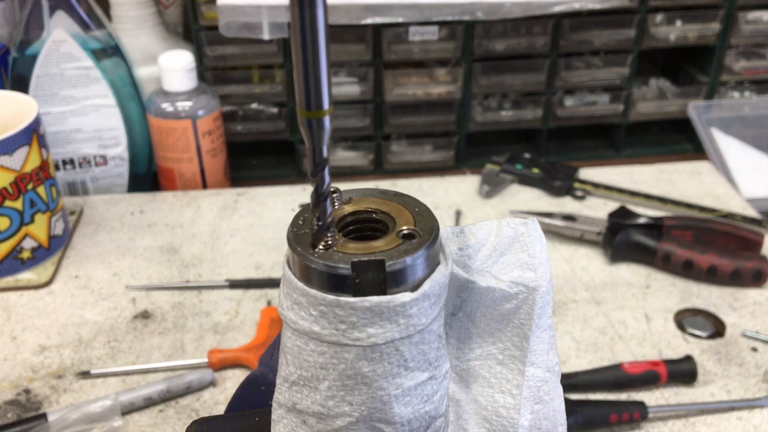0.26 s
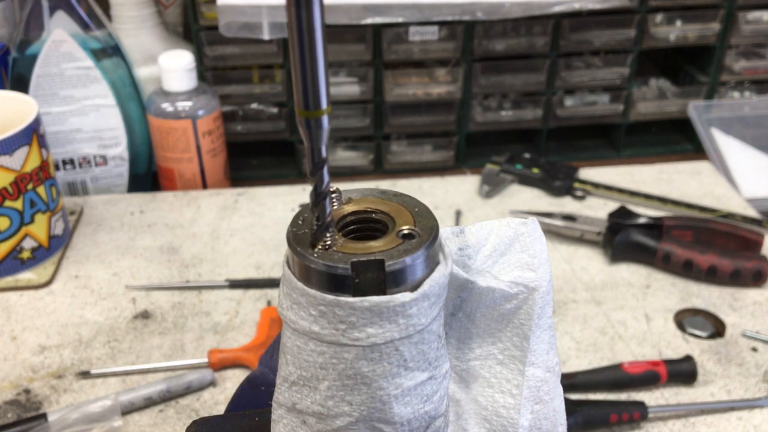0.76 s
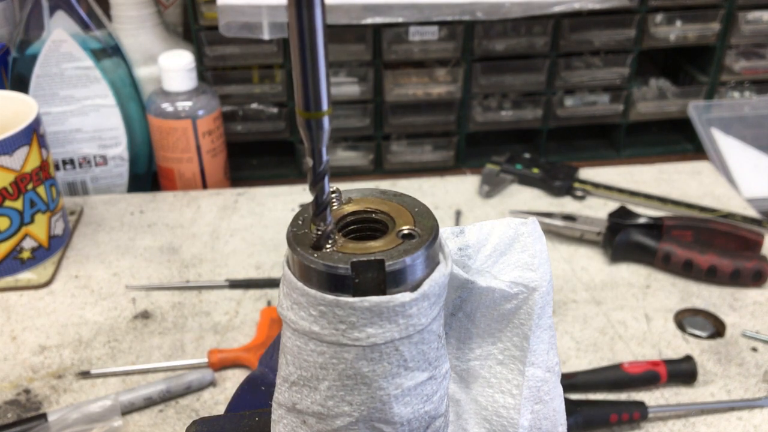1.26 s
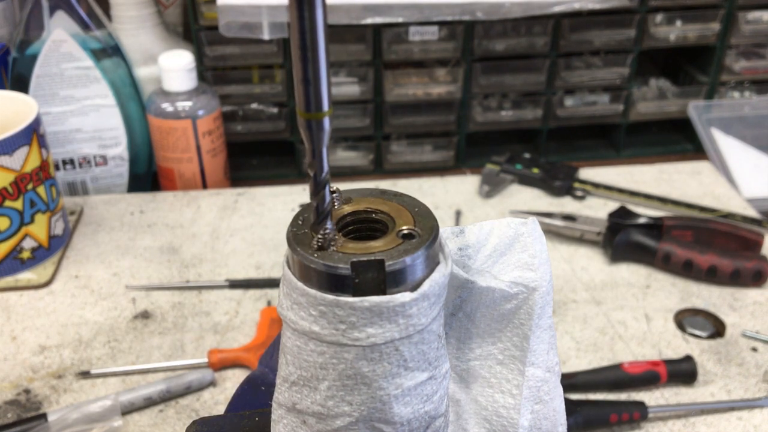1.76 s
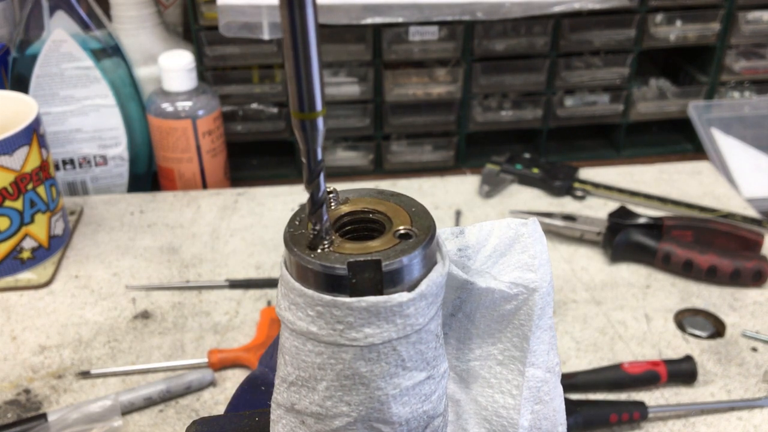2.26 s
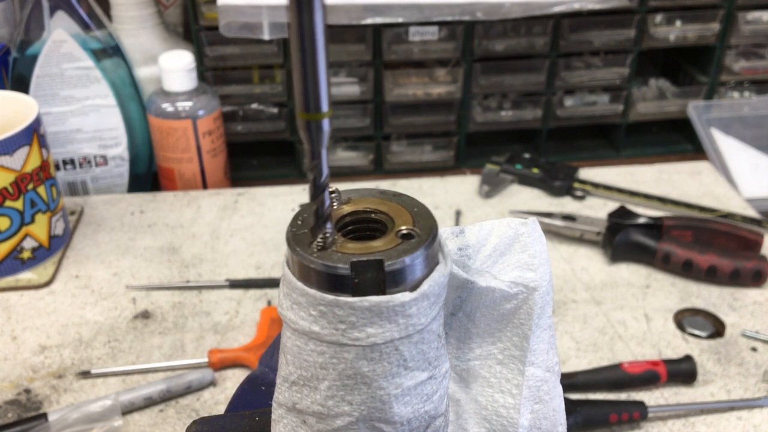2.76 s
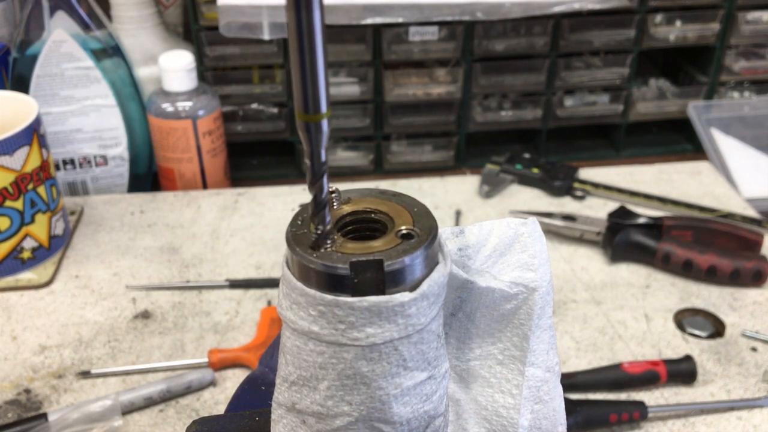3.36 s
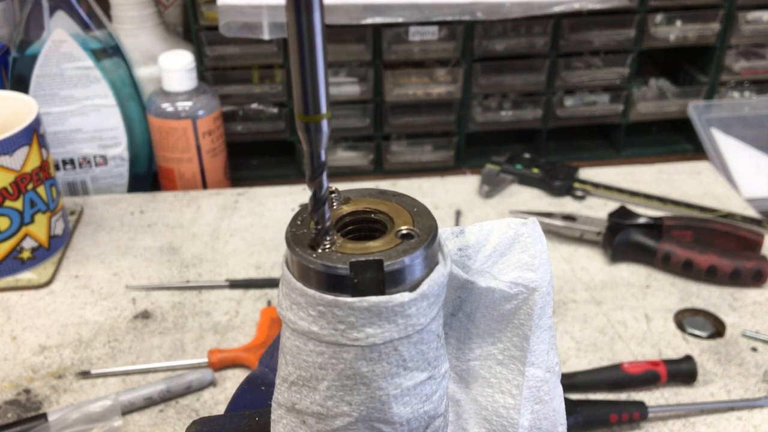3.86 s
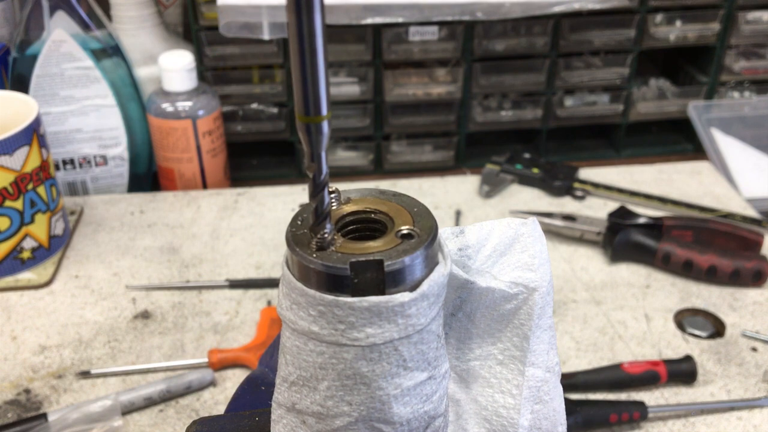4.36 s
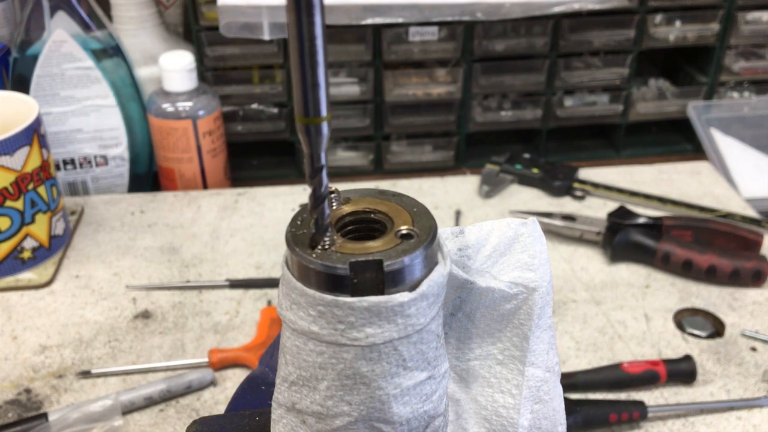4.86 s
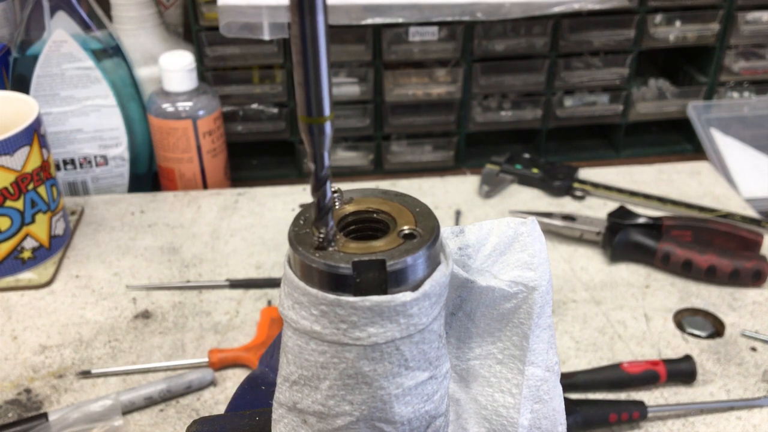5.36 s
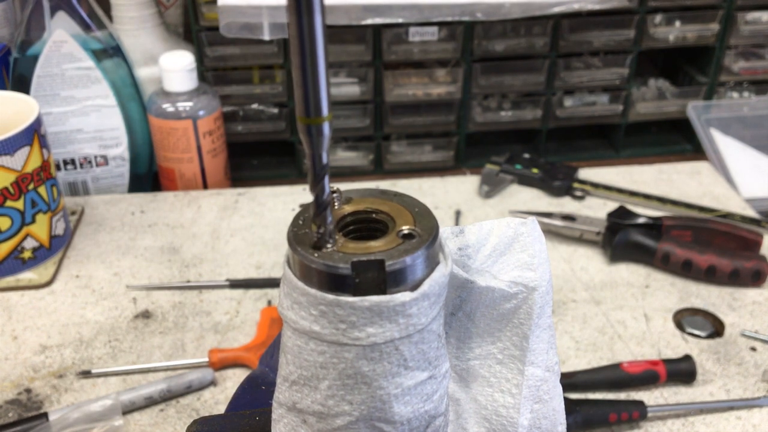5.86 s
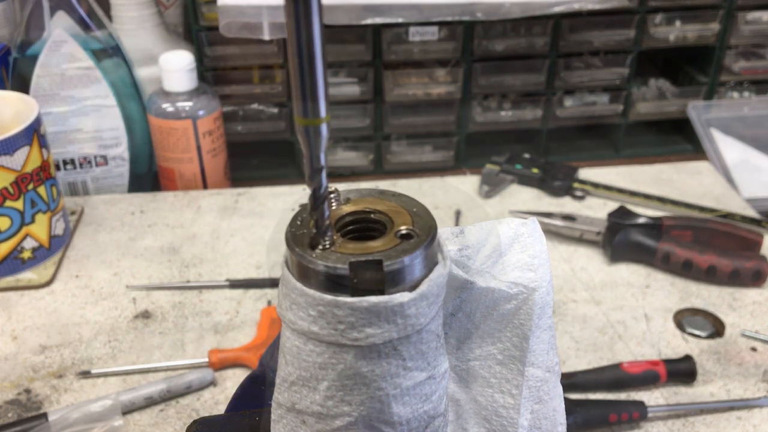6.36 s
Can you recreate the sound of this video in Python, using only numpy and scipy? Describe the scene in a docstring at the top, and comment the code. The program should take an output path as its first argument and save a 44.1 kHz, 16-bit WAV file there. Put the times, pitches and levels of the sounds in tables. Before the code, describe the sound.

A rasp already under way stops, then sharp ratchet clicks begin a steady back-and-forth: click, brief harsh metallic squeak, click, squeak. The squeals are gritty and uneven, sometimes dropping to a lower groan. Light handling and dull bench knocks fill the gaps. Close, dry mono sound with short room reverberation; after the last stroke only quiet hum and room tone remain.

```python
"""A hand tap cuts a steel part under a ratcheting wrench, close to the microphone in a small workshop.
Each forward stroke rasps and at times squeaks: stick-slip overtones and grit ring the steel.
Sudden slips, mostly at stroke starts, crack: noise bursts through the same steel resonances.
Between strokes the pawl clicks: cracks, knocks and ringing; the handle rubs and the bench thuds.
Behind lie a low machine hum and faint room noise, both coloured noise, and a short room reverberation."""
import sys
import numpy as np
from scipy import signal
from scipy.fft import rfft, irfft, next_fast_len
from scipy.io import wavfile
from scipy.ndimage import uniform_filter1d, map_coordinates

SR = 44100
rng = np.random.default_rng(int(sys.argv[2]) if len(sys.argv) > 2 else 0)


def persist_wave(psi):
    """Save psi, clipped to +-1, as 16-bit WAV."""
    counts = np.round(np.clip(psi, -1, 1) * 32767).astype(np.int16)
    wavfile.write(sys.argv[1], SR, np.atleast_2d(counts).T)


N = 291501

# machine hum, relative spectrum: (frequency [Hz], density [dB per Hz])
HUM_SPECTRUM = [(25, -39), (40, -7.5), (51, -13.5), (56, 0.5), (62, -2.5), (80, -19.5), (110, -40.5),
                (200, -120)]
# machine hum over time: (time [s], level [dB])
HUM_LEVEL = [(0.0, -49), (1.71, -54), (6.61, -55.5)]
# room noise, relative spectrum: (frequency [Hz], density [dB per Hz])
AIR_SPECTRUM = [(53, -28.5), (90, -13.5), (119, -3.5), (165, -15.5), (242, -11.5), (321, -13.5), (828, -24),
                (1760, -24.5), (2650, -33.5), (11500, -42.5), (15500, -46)]
AIR_DB = -58.5  # middle of the wandering room noise level
# reverberation of the workshop: (frequency [Hz], t60 [s])
ROOM_DECAY = [(300, 0.53), (2000, 0.21), (6000, 0.28), (14000, 0.15)]
# the handle rubs briefly in the hand: (time [s], peak before the resonances [dB])
RUBS = [(0.403, -40.5), (0.728, -42.5), (1.181, -52.5), (1.419, -38.5), (2.048, -43.5), (2.089, -30),
        (2.665, -40.5), (2.97, -40.5), (3.278, -38.5), (3.849, -38), (4.268, -36.5), (4.518, -34.5),
        (5.18, -34), (5.551, -28.5), (5.651, -31), (5.758, -35.5)]
# soft thuds through the bench: (time [s], relative peak before the resonances [dB])
THUDS = [(0.487, -45), (1.209, -48), (1.391, -45), (1.85, -51), (2.091, -43), (2.454, -51), (2.683, -43),
         (3.285, -43.5), (3.636, -46), (3.925, -47.5), (4.353, -41.5), (4.536, -49.5), (4.718, -64),
         (4.914, -46.5), (4.996, -47), (5.168, -42), (5.509, -44), (5.779, -52), (6.507, -46.5)]
# resonances of the bench: (frequency [Hz], width [Hz], gain [dB])
BENCH = [(124, 52, 4), (246, 110, -0.5), (295, 35, 6.5), (424, 72, -5.5)]
# pawl and handle contacts: (time [s], relative peak [dB], relative middle band peak [dB])
CLICKS = [(0.3901, -37.5, -48), (0.4536, -17, -36.5), (0.4726, -6, -20), (0.5088, -19, -38),
          (0.5399, -9.5, -18.5), (0.7042, -33, -59), (1.2009, -25, -39), (1.2507, -20.5, -43),
          (1.2678, -6.5, -20), (1.306, -15.5, -42), (1.374, -31, -44.5), (1.383, -9, -23),
          (1.7974, -43, -39.5), (1.8142, -26.5, -35.5), (1.862, -16, -39.5), (1.8794, -9.5, -24.5),
          (1.9193, -17.5, -41.5), (2.0818, -21.5, -41), (2.3687, -36.5, -37.5), (2.3935, -29, -50),
          (2.429, -36, -40.5), (2.4336, -24, -44), (2.4375, -22.5, -44.5), (2.445, -7, -28),
          (2.4923, -15.5, -42.5), (2.6612, -34, -50), (2.9973, -28.5, -43.5), (3.0295, -16, -23),
          (3.047, -11, -22.5), (3.0726, -18, -39.5), (3.0854, -7, -25), (3.1419, -17, -35.5),
          (3.2702, -22.5, -47), (3.6353, -22, -40), (3.6581, -39.5, -30.5), (3.6696, -18.5, -40.5),
          (3.6863, -7, -23.5), (3.7235, -17, -37), (3.9063, -27.5, -45.5), (4.2906, -28, -35.5),
          (4.2968, -23, -32.5), (4.3258, -17, -35), (4.3374, -6.5, -20.5), (4.3658, -12, -38),
          (4.3889, -10, -23.5), (4.9047, -24.5, -32.5), (4.934, -32.5, -46), (4.9493, -19, -41),
          (4.9645, -8, -25), (4.9965, -14.5, -51), (5.1344, -31, -33), (5.1741, -27, -54),
          (5.5013, -43.5, -37.5), (5.5216, -33.5, -44.5), (5.545, -24, -33.5), (5.5568, -15.5, -30.5),
          (5.5692, -28.5, -40.5), (5.5735, -6.5, -27), (5.5981, -19.5, -48.5), (5.6123, -25.5, -40),
          (5.6134, -8.5, -25.5), (5.6469, -25, -30), (5.7482, -28, -45), (6.1641, -39, -53)]
# pawl, clusters of close modes: (frequency [Hz], width [Hz], gain [dB])
PAWL_MODES = [(3330, 160, -9), (9200, 500, -17), (10850, 100, -7), (11100, 100, -5), (11480, 110, 0),
              (11640, 100, 0), (11920, 110, -3), (12700, 400, -16)]
FULL_DROP_DB = -29  # a middle band above this marks the pawl falling fully into a tooth
DROP_RING_DB, TICK_RING_DB = -5.5, -12.5  # ring of the pawl for full drops and for lighter ticks, relative
# tap, part and vice: (frequency [Hz], width [Hz], gain [dB])
PART_MODES = [(509, 580, -26), (733, 94, -1.5), (1238, 52.7, 8), (1479, 39, 2), (1965, 8.8, 7.5),
              (1979, 49, 0.5), (2234, 160, 3), (2598, 97, 2.5), (2720, 93, -9), (3126, 48, -1.5),
              (3730, 400, -12), (4120, 27, -10.5), (4840, 45, -5), (2233, 660, 0)]
# high resonances of the tap: (frequency [Hz], width [Hz], gain [dB])
EDGE_MODES = [(7830, 320, -2), (8700, 700, -7.5), (9310, 300, -1), (11200, 770, -7.5), (14570, 8200, -12),
              (10100, 1300, -20)]
SCRAPE_TOP_HZ = 15950  # upper band limit of the scraping sound
# sudden slips, mostly at stroke starts: (time [s], relative peak [dB], relative treble peak [dB])
JERKS = [(.853, -16.5, -18), (1.5424, -16.5, -4.5), (2.1426, -13.5, -19), (2.7697, -13, -17.5),
         (3.3671, -15, -23.5), (4.0293, -11.5, -11.5), (4.598, -24.5, -5), (5.2638, -11, 1),
         (5.3527, -23.5, -13), (5.885, -29, -3)]
# forward strokes, one list each: (time [s], level [dB])
STROKES = [
    [(0.0, -22.5), (0.05, -24), (0.142, -23), (0.21, -29), (0.23, -66)],
    [(0.853, -29), (0.857, -30.5), (0.93, -60.5)],
    [(0.972, -37), (0.996, -34), (1.004, -22), (1.028, -23.5), (1.04, -18), (1.06, -23.5), (1.098, -26.5),
     (1.112, -49.5)],
    [(1.541, -25.5), (1.551, -18), (1.593, -20.5), (1.623, -45.5), (1.639, -35.5), (1.697, -39.5),
     (1.723, -25), (1.75, -64)],
    [(2.143, -28), (2.167, -21), (2.275, -22.5), (2.297, -47)],
    [(2.77, -23.5), (2.78, -16), (2.792, -17.5), (2.826, -37), (2.872, -33.5), (2.894, -24.5),
     (2.93, -62.5)],
    [(3.367, -29), (3.381, -19.5), (3.401, -17.5), (3.529, -26), (3.548, -39.5)],
    [(4.03, -22), (4.038, -21), (4.072, -19.5), (4.102, -29), (4.136, -41.5), (4.172, -37.5),
     (4.184, -20.5), (4.21, -56)],
    [(4.598, -30), (4.602, -23.5), (4.628, -34.5), (4.65, -20), (4.746, -27.5), (4.786, -18), (4.84, -46.5)],
    [(5.263, -26), (5.277, -18.5), (5.315, -43.5), (5.331, -29), (5.369, -31.5), (5.385, -21.5),
     (5.411, -26.5), (5.44, -50)],
    [(5.886, -21), (5.898, -16), (5.92, -25.5), (6.026, -22.5), (6.068, -26.5), (6.085, -49)],
]
# spells of steady slipping, each until the next or the end of the stroke: (start [s], first slip rate [Hz],
# last slip rate [Hz], roughness before the bite [0-1], treble over the level before bite and dulling [dB])
SPELLS = [(0, 629, 640.6, 0.82, -9), (.14, 1131, 1025, 0.58, -4), (0.854, 1281, 1240, 0.55, -20),
          (.972, 1312, 1321, 0.65, -6), (0.999, 1408, 1183, .5, -13), (1.028, 1346, 1206, 0.32, -10.5),
          (1.04, 1200, 1190, .15, -11), (1.054, 1022, 974, .45, -13), (1.08, 662, 707, 0.5, -13),
          (1.542, 1224, 1259, 0.36, -17.5), (1.605, 1254, 1280, 0.31, -35), (1.705, 1125, 1197, 0.68, -6.5),
          (2.143, 1058, 1235, 0.42, -4.5), (2.19, 714.7, 681, 0.67, -7), (2.218, 1067, 1107, .4, -4),
          (2.26, 715, 697.4, 0.57, -8), (2.77, 1200, 1267, 0.35, -15), (2.814, 1276, 1326, 0.45, -20),
          (2.88, 1330, 1290, 0.73, -8), (3.368, 1228, 1203, 0.16, -8.5), (3.462, 692.3, 650, 0.72, -10),
          (4.03, 1215, 1255, .17, -17), (4.12, 1227, 1219, 0.56, -28), (4.175, 1252, 1273, 0.54, -15.5),
          (4.597, 1254, 1307, .55, -26), (4.64, 1281, 1199, .2, -8), (4.697, 1110, 1111, 0.31, -6),
          (4.735, 686.6, 667, 0.66, -5.5), (4.757, 1140, 1231, 0.3, -12.5), (4.8, 707.8, 707, 0.43, -13),
          (5.263, 1261, 1267, 0.31, -28), (5.335, 1276, 1207, 0.75, -10), (5.391, 696.5, 689.3, .55, -11.5),
          (5.886, 1287, 1200, 0.31, -15), (5.918, 679.6, 744.4, .75, -6), (5.99, 780, 810.4, 0.39, -9),
          (6.03, 510.5, 523, 0.66, -13)]
# how the tap passes on the slips: (frequency [Hz], gain [dB])
RADIATED = [(450, -23), (700, -4), (1230, -2.5), (1700, 0), (2400, 2.5), (3200, -2), (3700, -7),
            (4900, -15), (6100, -37.5), (7500, -18)]
CHANGE_S = .003  # one spell passes into the next
BITE_S, BITE_ROUGH, BITE_DB = 0.011, 0.4267, 14  # decay, added roughness and added treble as a stroke starts
GENTLE_DB, DULLING = -21, .8  # below this level the treble falls away faster, extra dB per dB
TOP_HZ = 17000  # upper band limit of the whole sound


def amp(db):
    """Amplitude factor of a level in dB."""
    return 10 ** (np.asarray(db) / 20)


def unit(x):
    """x scaled to rms 1."""
    return x / np.sqrt(np.mean(x ** 2) + 1e-20)


def along(points, hz):
    """Interpolate (Hz, value) points on a log frequency axis."""
    f, v = np.transpose(points)
    return np.interp(np.log(hz + 1), np.log(f + 1), v)


def played(tables):
    """Every column per sample, and a gate that is open while a table lasts."""
    t = np.arange(N) / SR
    s, *cols = np.transpose(np.vstack(tables))
    gate = sum((t >= rows[0][0]) & (t < rows[-1][0]) for rows in tables) > 0
    return [np.interp(t, s, c) for c in cols] + [gate]


def wobble(rate):
    """A smooth random curve, rate knots a second."""
    knots = rng.standard_normal(int(N * rate / SR) + 4)
    return map_coordinates(knots, [np.arange(N) * rate / SR])


def filtered(x, response):
    """Filter x by a complex response of frequency, padded so that ringing does not wrap round."""
    m = next_fast_len(N + SR // 2)
    return irfft(rfft(x, m) * response(np.fft.rfftfreq(m, 1 / SR)), m)[..., :N]


def resonant(peaks):
    """Causal response of (Hz, width Hz, dB) resonances, summed with alternating sign."""
    def response(f):
        total = 0
        for k, (centre, width, db) in enumerate(peaks):
            mode = 1j * f * width / (centre * centre - f * f + 1j * f * width)
            total = total + (-1) ** k * amp(db) * mode
        return total
    return response


def resonant_twice(peaks):
    """The resonances in series with themselves: steeper flanks, and gains that double in dB."""
    return lambda f: resonant(peaks)(f) ** 2


def noise(spectrum):
    """Coloured noise of rms 1."""
    return unit(filtered(rng.standard_normal(N), lambda hz: amp(along(spectrum, hz))))


def bursts(times, levels_db, rise, t60, tone_hz=None):
    """A short puff of noise, or of a tone near tone_hz, at each time; rise and t60 [s] may vary by puff."""
    t = np.arange(SR // 5) / SR
    rise, t60 = np.reshape(rise, (-1, 1)), np.reshape(t60, (-1, 1))
    envelope = (1 - np.exp(-(t / rise) ** 2)) * amp(-60 * t / t60)
    if tone_hz:
        pitch = tone_hz * (1 + .02 * rng.standard_normal((len(times), 1)))
        carrier = np.sin(2 * np.pi * pitch * t)
    else:
        carrier = rng.standard_normal((len(times), len(t)))
    puff = envelope * carrier
    puff = puff / np.abs(puff).max(axis=1, keepdims=True) * amp(levels_db)[:, None]
    where = np.round(times * SR).astype(int)[:, None] + np.arange(len(t))
    return np.bincount(where.ravel(), puff.ravel(), N + len(t))[:N]


def room_noise():
    """Faint broadband noise of the workshop, its level wandering slightly."""
    return amp(AIR_DB + 2.4 * wobble(14)) * noise(AIR_SPECTRUM)


def machine_hum():
    """Narrow low noise of a machine, following its level in time."""
    level_db, _ = played([HUM_LEVEL])
    return amp(level_db) * noise(HUM_SPECTRUM)


def room(x):
    """Reverberation by convolution with a noise tail in which each frequency dies at its own speed."""
    hz, t, z = signal.stft(rng.standard_normal(SR // 2), SR, nperseg=256)
    decay = amp(-60 * t / along(ROOM_DECAY, hz)[:, None])
    tail = signal.istft(z * decay, SR, nperseg=256)[1]
    delayed = np.pad(x, (130, 0))  # samples, about 3 ms
    return signal.fftconvolve(delayed, tail / np.linalg.norm(tail))[:N]


def handling():
    """Rubs of the handle and soft thuds that shake the bench: noise puffs through broad and low modes."""
    puffs = bursts(*np.transpose(RUBS), 0.005, .08)
    rubs = filtered(puffs, resonant([(1060, 1100, 12.2), (2350, 2000, 2.8)]))
    thuds = filtered(bursts(*np.transpose(THUDS), 0.0021, 0.29), resonant(BENCH))
    return rubs + amp(27.0) * thuds


def ratchet():
    """Each contact: a bright crack, a duller knock through the handle, and the ringing pawl."""
    s, db, middle_db = np.transpose(CLICKS)
    ring_db = np.where(middle_db > FULL_DROP_DB, DROP_RING_DB, TICK_RING_DB)
    length = 0.91 + 1.2 * amp(db + 4.0)  # hard contacts last longer
    crack = filtered(bursts(s, db + 4.0, 0.00046 * length, 0.009 * length),
                     resonant_twice([(9400, 4840, -0.5), (15320, 1800, -3.0)]))
    middle = filtered(bursts(s, middle_db + 6.5, 0.00067 * length, 0.0096 * length),
                      resonant_twice([(3200, 4300, 2.07), (6000, 1200, -9.5)]))
    knock = filtered(bursts(s, 0.49 * db - 24.5, 0.00079, 0.081),  # varies less than the crack
                     resonant([(705, 40, 14), (975, 120, 14.4), (2160, 1400, 6.8)]))
    snap = bursts(s, db + ring_db + 1.5, 0.00025 * length, 0.0083 * length, tone_hz=11410)
    ring = filtered(bursts(s, 0.89 * db + ring_db + 2, 0.001, 0.14), resonant(PAWL_MODES))
    return crack + middle + knock + snap + ring


def steel(low, high, shift_db=0):
    """The tap and part resonate to a low and a high force; the high resonances' weights wander at random."""
    edges = sum(filtered(high * amp(shift_db * wobble(9)), resonant([peak])) for peak in EDGE_MODES)
    body = filtered(low, resonant(PART_MODES))
    roll_off = lambda f: np.clip((SCRAPE_TOP_HZ - f) / 400, 0, 1) ** 2
    return filtered(np.array([body, edges]), roll_off)


def jerks():
    """Sudden slips, mostly at stroke starts, crack and ring the same steel."""
    s, db, treble_db = np.transpose(JERKS)
    low = bursts(s, db + 8.5, 0.00022, 0.024)
    high = bursts(s, treble_db + 2.0, .0001, 0.0086)
    return sum(steel(low, high))


def slipping():
    """Slip rate, roughness and treble per sample: each spell glides in rate, and strokes bite at first."""
    t = np.arange(N) / SR
    start, first_hz, last_hz, rough, treble_db = np.transpose(SPELLS)
    begins = np.array([rows[0][0] for rows in STROKES])
    ends = np.array([rows[-1][0] for rows in STROKES])
    stroke_index = np.minimum(np.searchsorted(ends, start, "right"), len(ends) - 1)
    stop = np.minimum(np.append(start[1:], N / SR), ends[stroke_index])
    k = np.maximum(np.searchsorted(start, t, "right") - 1, 0)  # spell at each sample
    done = np.clip((t - start[k]) / (stop - start)[k], 0, 1)
    # the first stroke is already under way, so it has no bite
    bite = sum((t >= s) * np.exp(-np.abs(t - s) / BITE_S) for s in begins[1:])
    blend = lambda x: uniform_filter1d(x, max(int(CHANGE_S * SR), 1))
    hz = blend(first_hz[k] + done * (last_hz - first_hz)[k])
    return hz, blend(rough[k]) + BITE_ROUGH * bite, blend(treble_db[k]) + BITE_DB * bite


def stroke():
    """The teeth stick and slip: regular slips squeak, uneven ones rasp; chips add grit and treble."""
    level_db, gate = played(STROKES)
    hz, rough, bright_db = slipping()
    treble_db = level_db + bright_db + DULLING * np.minimum(level_db - GENTLE_DB, 0)
    rough = np.clip(rough, 0, 1)
    hz = hz * np.exp(rough * (.035 * wobble(70) + .06 * wobble(250)))  # rough slips are uneven
    turn = 2 * np.pi * np.cumsum(hz) / SR

    soft_db = 0.52 * np.minimum(level_db + 22.0, 0)  # gentle slips are rounder: weaker overtones, dB per octave
    lines = 0
    for k in range(1, 8):
        line_db = along(RADIATED, k * hz) + soft_db * np.log2(k) + (2.0 + 3 * rough) * wobble(90)
        phase = k * turn + .4 * k * k + 0.5 * k * rough * wobble(400)
        lines = lines + amp(line_db) * np.cos(phase)
    slips = gate * amp(level_db + 1.32) * np.sqrt(1 - 0.99 * rough) * lines

    # sharp edge of each slip: high overtones
    sharp = unit(sum((k * hz < SCRAPE_TOP_HZ) * np.cos(k * turn + wobble(60)) for k in range(5, 24)))
    white = rng.standard_normal((2, N))
    scale = steel(*white).std(axis=1)  # what the steel makes of plain noise, to level the forces
    grain = unit(amp(1.1 * wobble(300)))
    tear = 0.78 * unit(1 + .9 * np.cos(turn)) * white[1] + 0.52 * sharp  # chips tear once a slip
    grit_force = gate * grain * amp(level_db + 1.0) * rough * white[0] / scale[0] + 0.4 * slips
    fizz_force = gate * grain * amp(treble_db) * tear / scale[1]
    grit, fizz = steel(grit_force, fizz_force, shift_db=3)
    return 0.79 * slips + grit + fizz


def scene():
    """The near sources, their reverberation and the background, in mono."""
    cutting = stroke() + jerks()
    clicks = ratchet() + handling()
    reverberation = room(amp(-14) * cutting + amp(-18.5) * clicks)
    background = machine_hum() + room_noise()
    return (cutting + clicks + reverberation + background)[None]


def record(dry):
    """Keep nothing above the band limit."""
    return filtered(dry, lambda hz: hz < TOP_HZ)


dry = scene()
out = record(dry)
persist_wave(out)
```